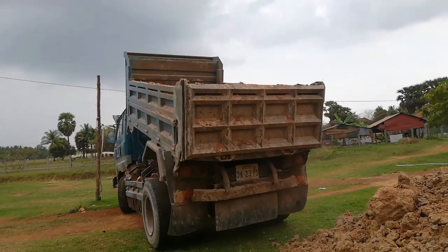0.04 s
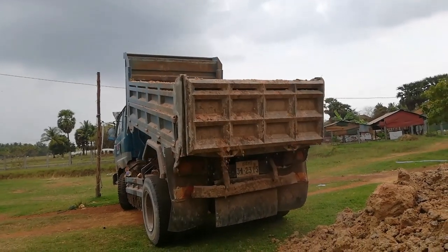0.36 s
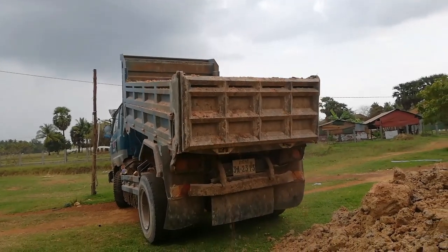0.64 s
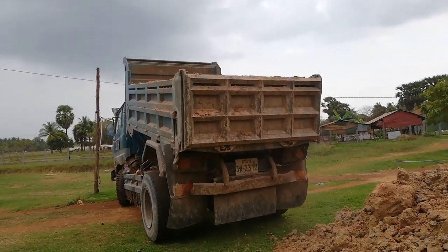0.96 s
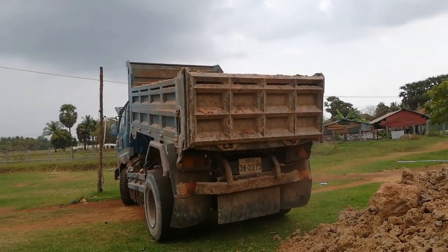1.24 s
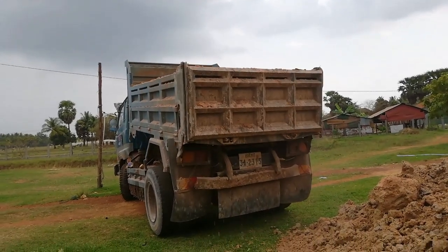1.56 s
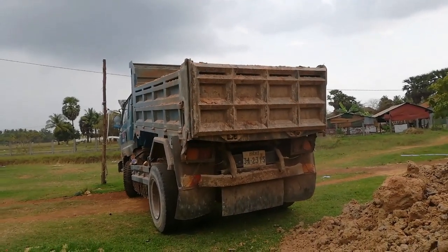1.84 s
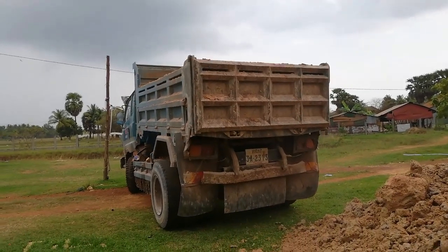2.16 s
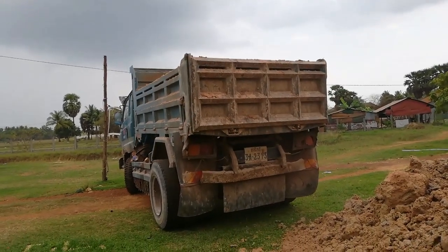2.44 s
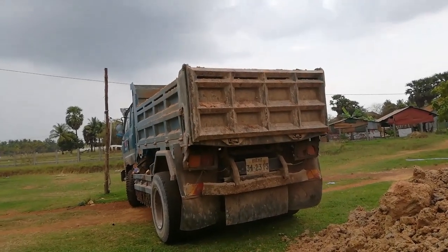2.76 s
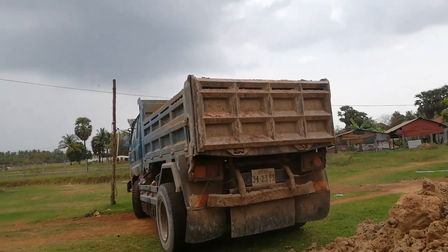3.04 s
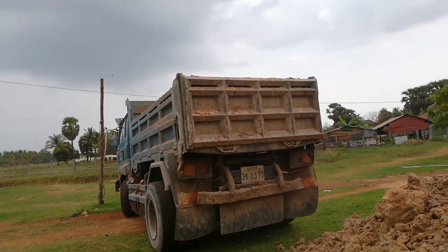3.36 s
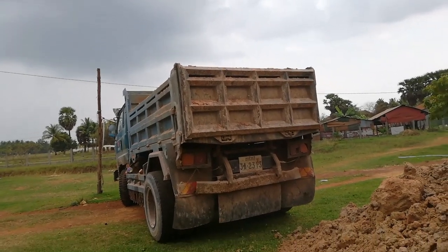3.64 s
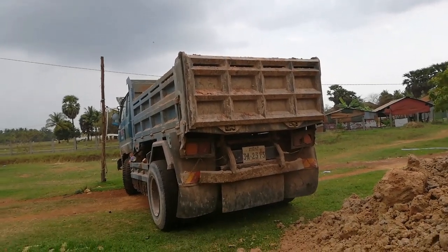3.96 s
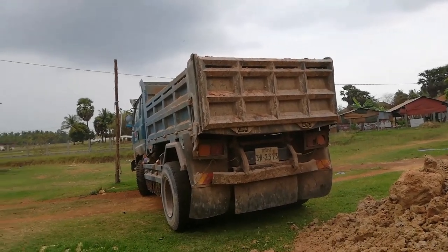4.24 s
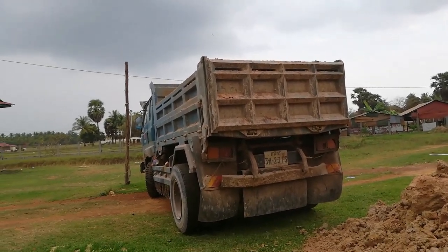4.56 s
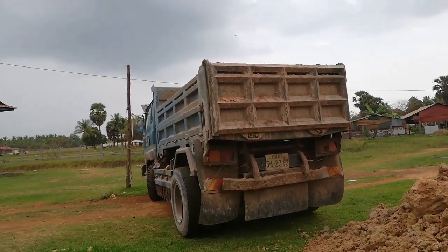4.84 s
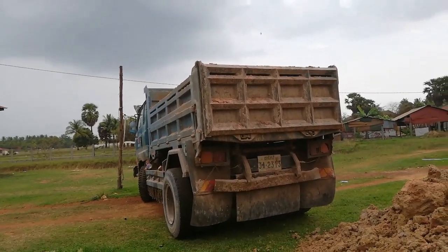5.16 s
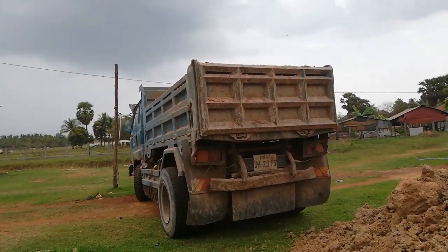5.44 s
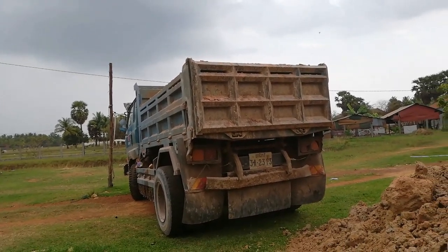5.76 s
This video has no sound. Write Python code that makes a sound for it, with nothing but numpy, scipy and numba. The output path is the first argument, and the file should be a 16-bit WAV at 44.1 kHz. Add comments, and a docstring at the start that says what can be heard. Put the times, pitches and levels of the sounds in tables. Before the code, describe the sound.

A heavy steel tailgate slams with a sharp crack and a boom, bangs again and bounces to rest, heard from a few metres away in a field. Underneath, a diesel engine idles steadily and hydraulic oil hisses softly. The dump truck's bed then lands with bright clanks and deep thuds, and shudders, rasping and squealing, until it settles. The idle finally rises slightly.

```python
"""In an open field, a few metres away, a dump truck lowers its empty steel bed while its diesel idles.
A hinge groans, then the hanging tailgate slams and bounces, ringing the bed's walls. Oil hisses out of
the ram that holds the bed up. The bed thuds onto the truck's frame and judders to rest, sticking and
slipping so that loose steel sings. At the end the engine speeds up a little.
A limiter turns the sound down for a moment after the slams."""
import sys
import numpy as np
from scipy import signal
from scipy.fft import rfft, irfft, next_fast_len
from scipy.io import wavfile
from scipy.ndimage import uniform_filter1d
from numba import njit

SR = 44100
rng = np.random.default_rng(int(sys.argv[2]) if len(sys.argv) > 2 else 0)


def master_out(mix):
    """Clip the mix to full scale and print it as 16-bit PCM to the path in sys.argv[1]."""
    frames = np.transpose(np.atleast_2d(mix))
    ceiling = np.clip(frames, -1, 1)
    pcm = np.round(ceiling * 32767).astype(np.int16)
    wavfile.write(sys.argv[1], SR, pcm)


N = 265041
T = np.arange(N) / SR
AGE = np.arange(SR) / SR  # seconds since a blow
SIDES = np.array([[1], [-1]])  # plus on the left, minus on the right


def undb(db):
    """Turn decibels into a number to multiply by."""
    return 10 ** (np.asarray(db) / 20)


def unit(x):
    """Scale a signal to an average (rms) size of 1."""
    return x / np.sqrt(np.mean(x ** 2))


def gains(colour, hz):
    """Read a table of f/Hz, level/dB as gains at the given frequencies."""
    at, db = np.transpose(colour)
    return undb(np.interp(np.log(hz + 1), np.log(at), db))


def freqs(size):
    """The frequency of each point in a spectrum."""
    return np.fft.rfftfreq(size, 1 / SR)


def noise(colour, size, alike_hz=1300):
    """Coloured stereo noise: left and right share the bass, but each has its own treble."""
    padded = next_fast_len(size, True)
    hz = freqs(padded)
    alike = 1 / (1 + (hz / alike_hz) ** 2)
    white = rfft(rng.standard_normal((2, padded)))
    mid, side = white * np.sqrt([1 + alike, 1 - alike]) * gains(colour, hz)
    return unit(irfft([mid + side, mid - side], padded)[:, :size])


def wobble(per_s):
    """A random wobble of size about 1 that heads for a new value per_s times a second."""
    step = int(SR / per_s)
    stairs = np.repeat(rng.standard_normal(N // step + 1), step)
    return unit(uniform_filter1d(stairs, step)[:N])


def ramp(start_s, length_s):
    """A steady climb from 0 to 1."""
    return np.clip((T - start_s) / length_s, 0, 1)


def add(out, s, sound):
    """Mix a sound in at time s."""
    start = int(s * SR)
    lo, hi = max(start, 0), min(start + sound.shape[-1], N)
    out[:, lo:hi] += sound[..., lo - start:hi - start]


def swells(table, rise_s, fade_s):
    """A loudness curve that swells and fades at each row of t/s, level/dB."""
    out = np.zeros((1, N))
    for s, db, *_ in table:
        add(out, s, undb(db) * (1 - np.exp(-AGE / rise_s)) * np.exp(-AGE / fade_s))
    return out


def puffs(cycles, width, floor, scatter_db, rise_s=0.0048):
    """A loudness curve that jumps once a cycle and fades, each time with its own strength."""
    strength = undb(scatter_db * rng.standard_normal(N))[cycles.astype(int)]
    pulses = strength * np.exp(-(cycles % 1) / width)
    return unit(floor + uniform_filter1d(pulses, int(rise_s * SR) + 1))


def ring_tones(table, detune=0.0026, apart_hz=2400, travel_s=0.000538):
    """Struck steel rings with a few clear tones; t60 is the time each takes to fade by 60 dB."""
    out = 0
    for hz, db, t60 in table:
        travel, tune, apart = rng.standard_normal(3)
        # tiny travel times put the high tones out of step, also between left and right
        phase = 2 * np.pi * hz * travel_s * travel + SIDES * apart * min(hz / apart_hz, 1)
        tone = np.sin(2 * np.pi * hz * (1 + detune * tune) * AGE + phase)
        out = out + undb(db - 60 * AGE / t60) * tone
    return out / np.sqrt(np.sum(undb(np.array(table)[:, 1]) ** 2) / 2)


def ring_wash(colour, low_t60, high_t60):
    """Countless close tones blur into a wash of noise; each octave fades at its own pace."""
    spectrum, out = rfft(noise(colour, SR)), 0
    octave = np.clip(np.log2((freqs(SR) + 1) / 100), 0, 7)
    for k, t60 in enumerate(np.geomspace(low_t60, high_t60, 8)):
        band = irfft(spectrum * np.maximum(1 - abs(octave - k), 0), SR)
        out = out + band * undb(-60 * AGE / t60)
    return out


def blows(table, ring, rise_s, burst, burst_s, order=1):
    """Each blow spreads through steel, bursts out and rings on. A soft hit has a low, dull cutoff."""
    out = np.zeros((2, N))
    shape = (1 - np.exp(-AGE / rise_s)) * (1 + burst * np.exp(-AGE / burst_s)) / (1 + burst / 2)
    for s, db, cutoff_hz in table:
        dulling = signal.butter(order, cutoff_hz, fs=SR)
        add(out, s, undb(db) * signal.lfilter(*dulling, ring() * shape))
    return out


# the exhaust's hum: multiple of the firing rate, level/dB
EXHAUST_HUM = [(1, -36), (2, -58), (2.5, -49), (3, -44.5), (5, -52), (6, -49)]
# colours of the exhaust's rumble, the diesel's clatter and the oil's hiss: f/Hz, level/dB
RUMBLE_COLOUR = [(20, -5), (50, -8.5), (75, 6), (100, 0.5), (160, 2.5), (240, -3.5), (360, -6.5),
                 (470, -17), (700, -97)]
CLATTER_COLOUR = [(250, -8), (450, -23.5), (600, -15), (780, -5), (960, 3.5), (1230, -8), (1600, -4),
                  (2000, -10.5), (3500, -9), (5500, -18.5), (7500, -21.5), (10300, -16), (12000, -23.5),
                  (15000, -68)]
HISS_COLOUR = [(1000, -32), (2500, -12), (4200, -2), (6500, -2.5), (8500, -2.5), (10300, 0.5),
               (12000, -2.5), (13500, -10.5), (15000, -26)]


def engine(idle_hz=39.89, sag_hz=0.6, speed_up_hz=3.85):
    """Each firing of the diesel feeds a deep hum, puffs out exhaust, clatters and drives the oil pump."""
    bed_down = ramp(start_s=3.0, length_s=0.465)
    speed_up = ramp(start_s=5.45, length_s=0.358)
    firing_hz = idle_hz - sag_hz * bed_down + speed_up_hz * speed_up
    cycles = np.cumsum(firing_hz * (1 + 0.00632 * wobble(14))) / SR
    hum = 0
    for k, db in EXHAUST_HUM:
        level = undb(db + min(0.64 * k, 2.5) * wobble(7.4))  # higher tones waver more
        hum = hum + level * np.sqrt(2) * np.sin(2 * np.pi * (k * cycles + rng.random()))
    rumble = noise(RUMBLE_COLOUR, N) * puffs(cycles, width=0.89, floor=0.91, scatter_db=0.5)
    clatter = noise(CLATTER_COLOUR, N) * puffs(cycles, width=0.57, floor=2.2, scatter_db=4.0)
    # oil rushes through a valve and quietens once the bed is down; the pump follows the engine
    hiss = noise(HISS_COLOUR, N) * puffs(cycles, width=0.17, floor=1.3, scatter_db=4.5)
    hiss_db = -49.5 - 8.5 * bed_down + 5 * speed_up + 0.5 * wobble(8)
    return hum + undb(-39) * rumble + undb(-43) * clatter + undb(hiss_db) * hiss


# squeaks of dry steel: t/s, f/Hz, level/dB, length/s
PIVOT_SQUEAKS = [(3.01, 7070, -47, .21), (3.342, 5420, -35, .032), (3.483, 5780, -32, .032)]


def squeaks():
    """Dry pivots rub and give thin, rough squeaks."""
    out = np.zeros((2, N))
    for s, hz, db, length_s in PIVOT_SQUEAKS:
        swell = signal.windows.tukey(int(length_s * SR), 0.6)
        pitch = hz * (1 + 0.016 * wobble(700)[:len(swell)])
        flicker = 1 + 0.4 * wobble(110)[:len(swell)]
        add(out, s, undb(db) * swell * flicker * np.sin(2 * np.pi * np.cumsum(pitch) / SR))
    return out


# the tones in the hinge's groan: multiple of the pitch, level/dB
GROAN_TONES = [(1, -26.5), (2, -34.5), (3, -38)]


def hinge(start_hz=249, sink_hz_per_s=280):
    """The swinging tailgate makes its dry hinge groan, sinking in pitch until the slam stops it."""
    pitch = (start_hz - sink_hz_per_s * T) * (1 + 0.021 * wobble(184))
    phase = 2 * np.pi * np.cumsum(pitch) / SR
    groan = sum(undb(db) * np.sin(k * phase + 2 * np.pi * rng.random()) for k, db in GROAN_TONES)
    return groan * (1 - ramp(start_s=0.061, length_s=0.037))


# clanks under the bed: t/s, level/dB, cutoff f/Hz
LINK_CLANKS = [(1.232, -29, 1400), (3.063, -27, 6000), (3.075, -26.5, 2000), (3.235, -36.5, 4000),
               (3.407, -36, 5000), (3.492, -30, 5000)]
# the tones of the links: f/Hz, level/dB, t60/s
LINK_TONES = [(770, -4, 0.18), (1389, -1, 0.12), (1561, 4, 0.036), (2355, 1.5, 0.07), (5550, -3, 0.04)]
# colour of the wash from small steel parts: f/Hz, level/dB
SMALL_STEEL_COLOUR = [(200, -3), (650, 4.5), (1250, 8.5), (2300, -0.5), (3400, -5), (5600, -3.5),
                      (8000, -10), (11500, -2), (15000, -32)]


def links():
    """Small hinges and links under the bed knock together in short, bright clanks."""
    def ring():
        tones = ring_tones(LINK_TONES, detune=0.006)
        return tones + undb(-3) * ring_wash(SMALL_STEEL_COLOUR, low_t60=0.11, high_t60=0.12)
    return blows(LINK_CLANKS, ring, rise_s=0.0003, burst=0.16, burst_s=0.0018)


# how hard the juddering bed pushes: t/s, level/dB
JUDDER_FORCE = [(3.53, 10.5), (3.66, 6.5), (3.76, 0), (4.05, -2), (4.14, 2), (4.31, 3.5), (4.4, 7.5),
                (4.68, 5), (4.8, 8)]


def judder(first_s=3.49, last_s=4.806, gap_s=0.035, extra_gap_s=0.028, count=50):
    """The landed bed sticks and slips, slowing at the end. Gives t/s, level/dB for each slip."""
    gaps = gap_s + extra_gap_s * np.exp(-np.arange(count) / 3.6)  # counted back from the last slip
    times = last_s - np.cumsum(gaps) + gaps
    levels = np.interp(times, *np.transpose(JUDDER_FORCE)) + rng.standard_normal(count)
    return np.column_stack([times, levels])[times > first_s]


# colour of the shaking frame: f/Hz, level/dB
SHUDDER_COLOUR = [(40, -6), (90, 9), (160, 0), (280, -9.5), (600, -29.5), (1500, -69)]


def shudder(knocks, slips):
    """The truck's frame rumbles on after every knock and slip of the bed."""
    after_knocks = undb(-16.5) * swells(knocks, rise_s=0.025, fade_s=0.081)
    after_slips = undb(-38.5) * swells(slips, rise_s=0.015, fade_s=0.045)
    return (after_knocks + after_slips) * noise(SHUDDER_COLOUR, N)


# the tones of a loose steel part: f/Hz, level/dB
LOOSE_TONES = [(888, -1.5), (1730, -17.5)]
# its squeals: t/s, level/dB
LOOSE_SQUEALS = [(3.524, -31), (3.546, -33), (3.58, -34), (3.662, -34.5), (3.695, -38), (3.741, -38),
                 (4.082, -39), (4.17, -37.5), (4.31, -39), (4.373, -38.5), (4.459, -36), (4.594, -38.5),
                 (4.687, -32), (4.744, -33), (4.818, -38.5)]


def loose_steel(slips, sing_db=-34, lag_s=0.011, squeal_s=0.038):
    """Rubbed by the judder, a loose part sings from slip to slip and breaks into rough squeals."""
    phase_per_hz = 2 * np.pi * np.cumsum(1 + 0.014 * wobble(250) + 0.004 * wobble(20)) / SR
    tone = sum(undb(db) * np.sin(hz * phase_per_hz) for hz, db in LOOSE_TONES)
    loudness = swells([(s + lag_s, sing_db) for s, _ in slips], rise_s=0.014, fade_s=0.022)
    for s, db in LOOSE_SQUEALS:
        add(loudness, s, undb(db) * signal.windows.tukey(int(squeal_s * SR), 0.8))
    return loudness * tone * (1 + 0.4 * wobble(280))


# single jerks of the bed: t/s, level/dB
BED_JERKS = [(3.888, -35.5), (4.018, -35), (4.081, -37), (4.808, -44)]
# colour of steel scraping on steel: f/Hz, level/dB
RASP_COLOUR = [(500, -10.5), (1000, 11), (1600, 3), (2400, 4.5), (4600, -3), (7500, -12), (11000, -10),
               (15000, -57)]
# the tones of the rails under the bed: f/Hz, level/dB, t60/s
RAIL_TONES = [(1520, 2.5, 0.015), (1720, 1, .016), (2800, 0, 0.009), (3780, 0, 0.011), (5000, 0, .007)]


def scraping(slips, slip_db=-41.5, ticks_per_s=1000, tick_s=0.0013):
    """Every slip or jerk of the bed is a spray of tiny ticks that rasp and make the rails ring."""
    force = swells(np.vstack([slips + [0, slip_db], BED_JERKS]), rise_s=0.0045, fade_s=0.017)
    ticks = (rng.random(N) < ticks_per_s / SR) * rng.uniform(-1.02, 1, N)
    crack = noise(RASP_COLOUR, SR) * np.exp(-AGE / tick_s)
    rasp = unit(signal.fftconvolve(ticks[None], crack)[:, :N])
    rails = unit(signal.fftconvolve(ticks[None], ring_tones(RAIL_TONES))[:, :N])
    return force * undb(0.5) * (rasp + undb(-4) * rails)


# the bed knocks on the frame, jolted by the first slam and later landing: t/s, level/dB, cutoff f/Hz
BED_KNOCKS = [(.066, -12, 300), (3.238, -26, 2500), (3.262, -24.5, 400), (3.305, -15.5, 447),
              (3.328, -24, 1500), (3.348, -23, 600), (3.383, -21.5, 292), (3.49, -28, 900)]
# the frame's tones: f/Hz, level/dB, t60/s
FRAME_TONES = [(77.4, 0, 0.14), (91, 12, 0.12), (211, 4.5, 0.28)]
# colour of the frame's wash: f/Hz, level/dB
FRAME_COLOUR = [(35, -1), (85, 2), (130, 2.5), (200, -16), (330, -6.5), (560, -25), (950, -15), (2000, -28),
                (5000, -20.5), (12000, -30)]


def bed_landing():
    """The bed drops onto its pads, and the frame answers with deep thuds."""
    def ring():
        return ring_tones(FRAME_TONES) + undb(6) * ring_wash(FRAME_COLOUR, low_t60=0.38, high_t60=0.45)
    return blows(BED_KNOCKS, ring, rise_s=0.004, burst=3.0, burst_s=0.01)


# the latch hooks strike: t/s, level/dB, cutoff f/Hz
LATCH_HITS = [(.06, -19, 12000), (.068, -6.5, 9000), (.101, -17, 13000), (.887, -14, 5530),
              (.902, -10, 4000), (.912, -22, 13000)]
# the hooks' tones: f/Hz, level/dB, t60/s
LATCH_TONES = [(1130, -1.5, 0.02), (3267, -6, 0.032)]


def latches():
    """The latch hooks crack against the slamming tailgate and leave a bright wash."""
    def ring():
        tones = ring_tones(LATCH_TONES, detune=0.012)
        return tones + undb(-1.5) * ring_wash(SMALL_STEEL_COLOUR, low_t60=0.36, high_t60=0.32)
    return blows(LATCH_HITS, ring, rise_s=0.00047, burst=0.27, burst_s=0.002)


# the tones of the bed's walls: f/Hz, level/dB, t60/s, swell time/s, left-right phase gap/rad
WALL_TONES = [(524, -10, 0.42, 0.018, 2.08), (662, -10.5, 0.36, 0.0041, 1.83),
              (758, -7.5, 0.22, 0.0035, 0.76), (847, -7.5, 0.22, 0.0024, 0.27), (896, -12, 0.31, .01, 0.94),
              (1060, -18, 0.35, 0.011, .8), (1294, -18.5, 0.2, .003, .8)]


def walls(slams):
    """The bed's steel walls clang on after the hard slams; each tone swells at its own pace."""
    out, ring = np.zeros((2, N)), 0
    for hz, db, t60, swell_s, apart in WALL_TONES:
        phase = 2 * np.pi * (hz * AGE + rng.random()) + SIDES * apart / 2
        ring = ring + undb(db - 60 * AGE / t60) * (1 - np.exp(-AGE / swell_s)) * np.sin(phase)
    for s, db, cutoff_hz in slams:
        if db > 0:
            add(out, s, undb(db) * signal.lfilter(*signal.butter(2, cutoff_hz, fs=SR), ring))
    return out


# the tailgate hits the bed: t/s, level/dB, cutoff f/Hz
GATE_SLAMS = [(.068, 10, 7400), (0.098, 0.5, 420), (.205, -8, 262), (0.276, -13, 343), (.868, -20.5, 390),
              (0.891, 7, 490), (1.235, -9, 410), (1.41, -12, 377), (1.494, -18.5, 352)]
# the tailgate's tones: f/Hz, level/dB, t60/s before the bed damps them
GATE_TONES = [(190, -5.5, 1), (236.3, 0, 0.7), (239.6, 6.5, 0.3), (286, 0, 0.69), (315, 2.5, 0.35),
              (366, -1, 0.51), (1493, 10.5, 0.018)]
# colour of the tailgate's wash: f/Hz, level/dB
GATE_COLOUR = [(50, -11.5), (130, -2), (240, 0.5), (370, -2.5), (580, -10), (830, -2.5), (1200, -13),
               (1520, -16), (2000, -18.5), (3500, -20), (7000, -25.5), (12000, -21), (15000, -68)]
# how much louder tailgate and walls are on the left than on the right: f/Hz, level/dB
GATE_LEFT_OVER_RIGHT = [(380, -0.5), (690, -10.5), (1280, 0), (4400, -2), (12000, -7)]


def tailgate(damping_db_per_s=20):
    """The big ribbed plate booms on every bounce; resting against the bed makes it fade sooner."""
    def ring():
        tones = ring_tones(GATE_TONES, apart_hz=1400, travel_s=0.0005)
        wash = ring_wash(GATE_COLOUR, low_t60=0.75, high_t60=0.36)
        return (tones + undb(-6) * wash) * undb(-damping_db_per_s * AGE)
    booms = blows(GATE_SLAMS, ring, rise_s=0.004, burst=2.4, burst_s=0.018, order=2)
    return lean(booms + walls(GATE_SLAMS), GATE_LEFT_OVER_RIGHT)


def lean(sound, left_over_right, left_lead_s=0):
    """Tip each frequency to the left or right; the left side can also arrive a little early."""
    size = next_fast_len(N, True)
    hz = freqs(size)
    lead = np.exp(2j * np.pi * hz * left_lead_s)
    tilt = np.sqrt(gains(left_over_right, hz))
    return irfft(rfft(sound, size) * np.array([tilt * lead, 1 / tilt]), size)[:, :N]


def scene():
    """The whole truck in the open air; the same slips drive the scraping, singing and shudder."""
    slips = judder()
    truck = engine() + hinge() + tailgate() + latches() + bed_landing() + links()
    return truck + scraping(slips) + loose_steel(slips) + shudder(BED_KNOCKS, slips) + squeaks()


@njit
def follow(x, attack, release):
    """Track loudness, rising at the attack rate and sinking at the release rate."""
    out, level = np.empty(len(x)), 0.
    for i in range(len(x)):
        level += (x[i] - level) * (attack if x[i] > level else release)
        out[i] = level
    return out


# how much louder the left microphone is than the right: f/Hz, level/dB
MIC_LEFT_OVER_RIGHT = [(200, 0.27), (400, 2), (680, 6.5), (1200, 0), (2360, -3.5), (4350, -4), (8020, 5),
                       (12000, 2.5)]


def record(dry, attack_s=0.00032, release_s=0.09, look_ahead_s=0.0015, threshold=0.3, top_hz=15000):
    """Two microphones hear the truck; loud moments are turned down, peaks clipped, top treble cut."""
    heard = lean(dry, MIC_LEFT_OVER_RIGHT, left_lead_s=0.0001)  # the left one is a little nearer
    loudness = follow(abs(heard).max(axis=0), 1 / (attack_s * SR), 1 / (release_s * SR))
    loudness = np.interp(T + look_ahead_s, T, loudness)
    gain = np.maximum(loudness / threshold, 1) ** -0.65  # takes off 65% of the dB above the threshold
    limited = np.clip(heard * gain, -1, 1)
    return signal.sosfilt(signal.ellip(8, 0.2, 70, top_hz, fs=SR, output="sos"), limited)


dry = scene()
out = record(dry)
master_out(out)
```